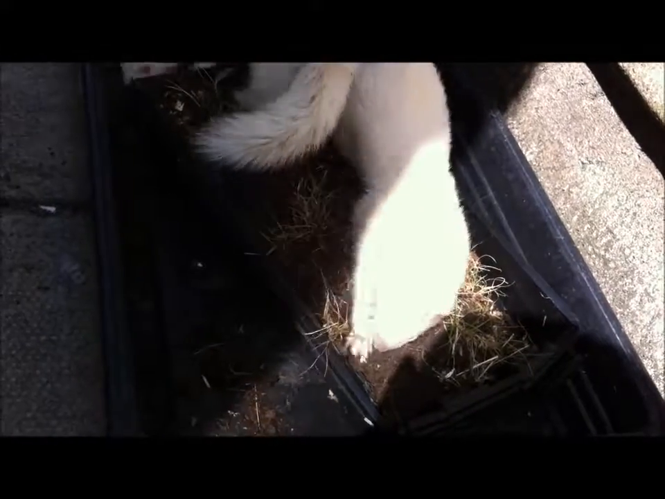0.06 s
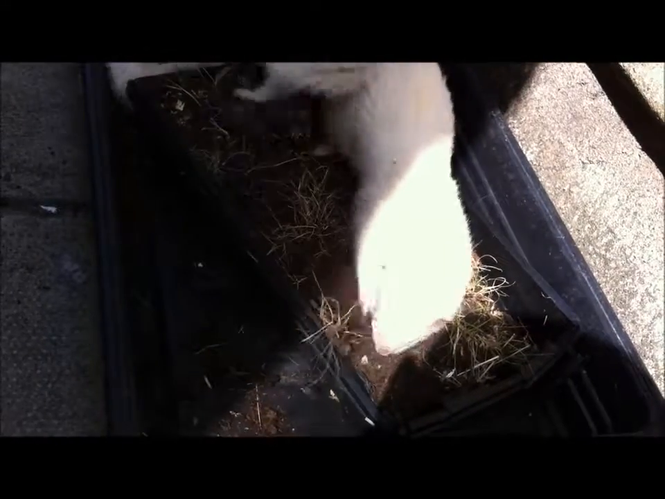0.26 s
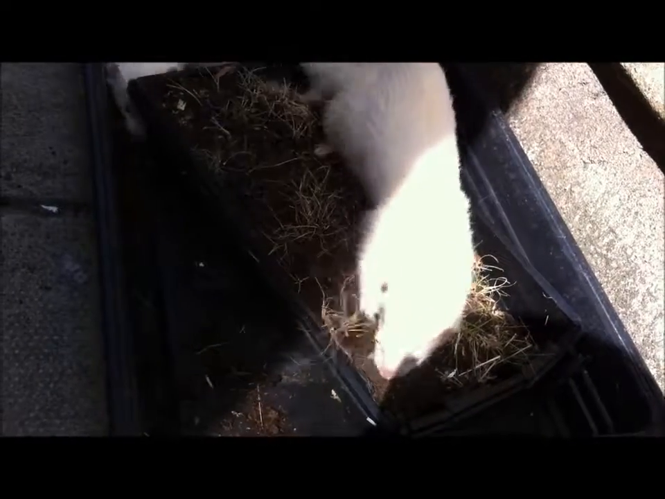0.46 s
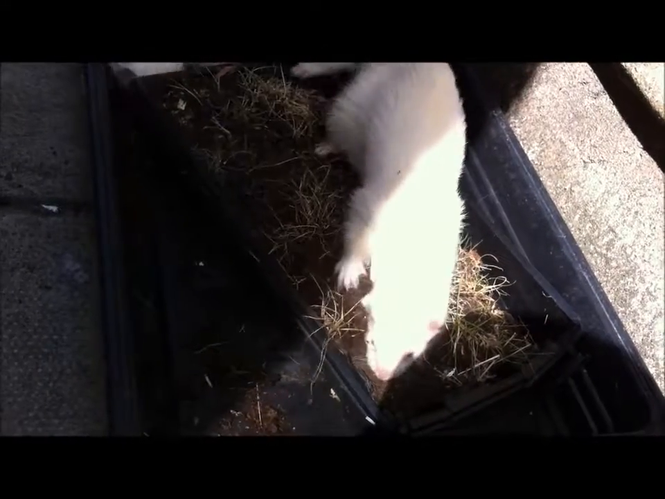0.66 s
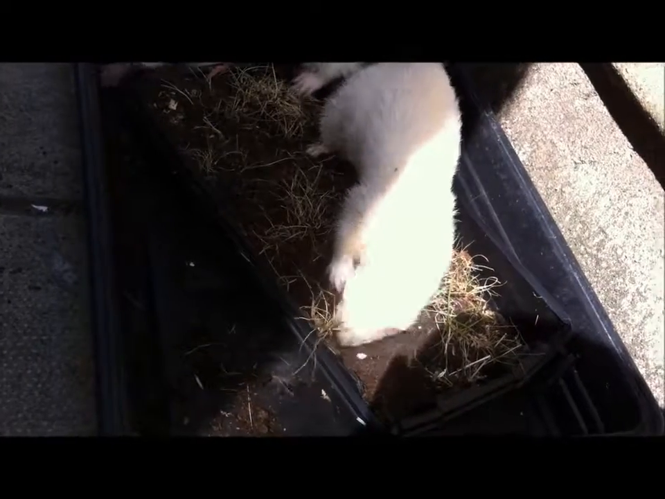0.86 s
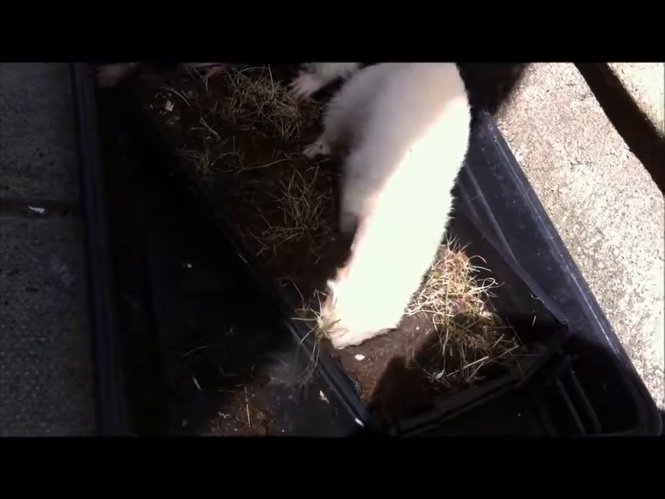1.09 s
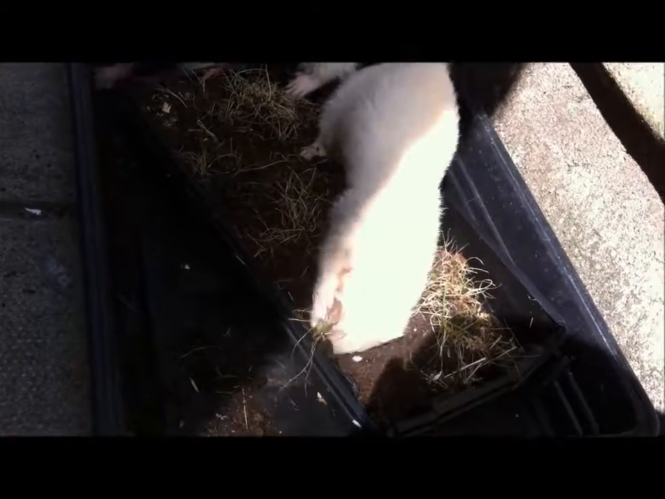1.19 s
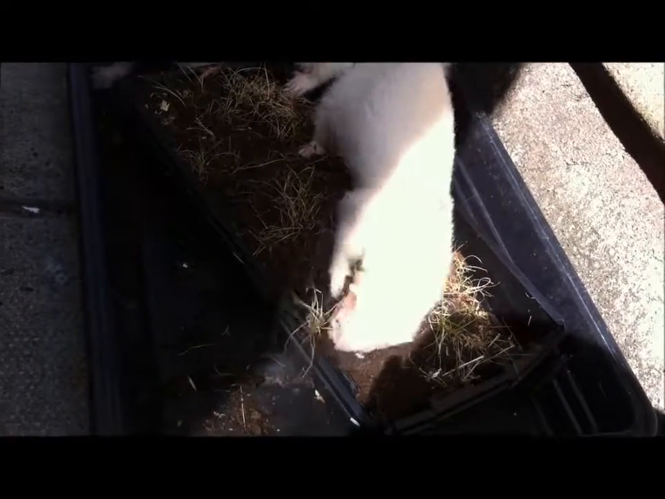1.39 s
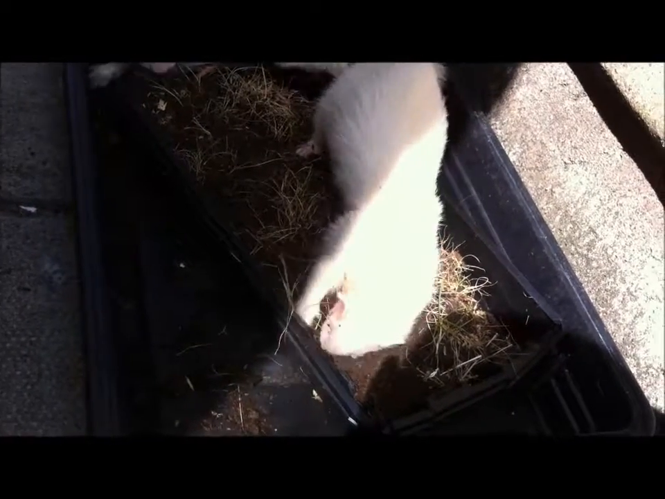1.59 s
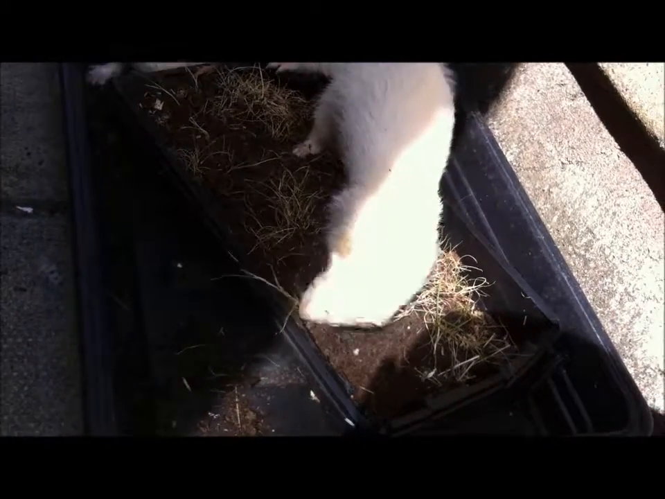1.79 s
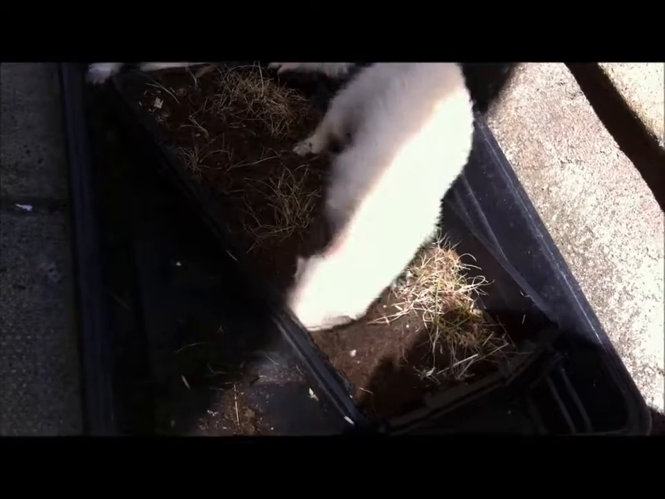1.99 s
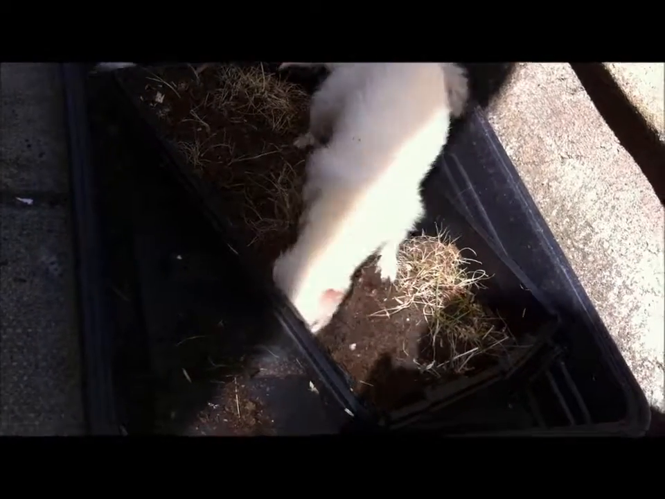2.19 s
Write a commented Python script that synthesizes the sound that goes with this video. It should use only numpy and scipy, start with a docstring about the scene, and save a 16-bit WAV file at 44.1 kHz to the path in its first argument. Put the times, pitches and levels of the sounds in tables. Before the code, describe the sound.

Close scratching and rustling of a small animal digging in straw and soil in a quiet yard. A busy flurry with hollow knocks on a plastic tray gives way to a lull, then more crackles and rim taps.

```python
"""A yard outdoors, close on a plastic tray of soil and straw in which a ferret is digging.
Its strokes shift crumbs and stalks in swells of tiny clicks and hiss; dry stems and grit snap under
its claws. Its paws thump the tray floor, knock the wall and tap the rim, ringing the damped plastic,
and pat softly on loose soil. A short yard echo and a faint bed of outdoor air lie behind."""
import sys
import numpy as np
from scipy import signal
from scipy.fft import rfft, irfft, next_fast_len
from scipy.io import wavfile
from scipy.ndimage import uniform_filter1d

SR = 44100
rng = np.random.default_rng(int(sys.argv[2]) if len(sys.argv) > 2 else 0)


def pcm_store(signal):
    """Save signal as 16-bit PCM."""
    levels = np.round(np.clip(np.atleast_2d(signal), -1, 1) * 32767)
    wavfile.write(sys.argv[1], SR, levels.astype(np.int16).T)


N = 99225
T = np.arange(N) / SR

# tone of the outdoor air (f/Hz, level/dB)
AIR_COLOUR = [(25, -23), (140, -3), (240, -3), (274, 1.5), (322, -8.5), (378, -5), (598, -12.5),
              (826, -8.5), (1410, -16), (1800, -16), (2560, -19), (3900, -19.5), (15500, -24)]
# strokes through the litter (peak t/s, rise/s, fall/s, relative level/dB, tilt/dB per octave,
# stalk resonance f/Hz, its boost/dB)
STROKES = [(.006, 0.016, 0.027, -50.5, -1.5, 4460, 10.5), (.06, 0.019, 0.017, -52, 0, 4270, -8),
           (0.117, 0.02, 0.033, -53.5, 0, 4130, 4.5), (.22, 0.073, 0.38, -60, -2.5, 2300, -1),
           (0.338, 0.013, 0.012, -41.5, -1.2, 1680, 11.5), (0.358, 0.015, 0.028, -43, -2.5, 13500, 10),
           (.378, .014, 0.017, -43.5, 2, 12000, -2), (0.435, 0.012, 0.026, -45.5, -0.5, 2160, 3),
           (.472, 0.029, 0.012, -53.5, 0, 7500, 0), (0.504, 0.018, 0.0094, -48, 5, 4900, 16),
           (0.522, 0.015, 0.032, -45, -1.5, 5280, 11.5), (.62, 0.016, 0.0074, -54.5, 0, 4120, 7),
           (0.64, 0.0067, 0.0075, -55.5, 7, 4430, 8), (.735, 0.056, 0.035, -55, -0.2, 3740, 0.5),
           (.80, 0.018, 0.064, -61, 1, 1000, 11), (0.875, 0.0075, 0.015, -50, 3.5, 8400, 7.5),
           (1.101, 0.0099, 0.03, -59, -2, 1390, 5), (1.21, 0.011, 0.027, -65.5, -1, 9000, 10),
           (1.418, 0.02, 0.016, -55.5, -1.5, 2780, 7), (1.59, 0.032, 0.056, -63.5, -2, 3550, 6),
           (1.632, 0.0076, 0.011, -46.5, -2.2, 11100, 8), (1.676, 0.022, 0.013, -51.5, 0.5, 3600, -2),
           (1.693, 0.0064, 0.02, -56.5, -2, 3600, 1), (1.758, 0.036, 0.085, -54, -1, 4700, -1),
           (1.825, .02, 0.1, -63.5, 6.5, 2300, -4), (1.93, 0.0081, 0.012, -54.5, -1, 2240, 7),
           (1.969, 0.028, 0.006, -57, -2.5, 9600, 4), (2.024, 0.0055, 0.037, -53, -1, 5140, 10),
           (2.24, 0.045, 0.066, -55, 1, 990, 10.5)]
# tone of the soil and straw (f/Hz, level/dB)
LITTER_COLOUR = [(260, -25), (450, 6.5), (650, -3.5), (1080, -5.5), (1290, 0.5), (1780, -4), (1980, -4.5),
                 (2260, 0.5), (3090, -6), (4340, -0.5), (5750, -5.5), (9230, 0), (15500, -7.5)]
# snaps of straw and grit (t/s, relative level/dB, four columns of share/dB for the SNAP_BANDS,
# stem f/Hz, share of its ring/dB)
SNAPS = [(0.0074, -38.5, -27, -8.5, -14.5, -15, 4300, -6),
         (0.0628, -30.5, -23.5, -9, -10.5, -14, 4460, -22), (0.0822, -36.5, -21, -10, -16, -12, 4170, -13),
         (0.1171, -32.5, -24, -9.5, -10, -16.5, 4600, -21),
         (0.2044, -34, -12, -13, -17.5, -15.5, 2290, -21),
         (0.2483, -23.5, -12.5, -6.5, -14.5, -19.5, 2877, -11.5),
         (0.2773, -35.5, -8.5, -10, -11.5, -18, 2210, -10.5), (0.3308, -36, -22, -4, -26, -9, 1890, -14),
         (0.3496, -30.5, -5, -12.5, -9.5, -19, 1780, -9),
         (0.4284, -30, -13.5, -29, -13.5, -13, 1745, -14.5),
         (0.4886, -23, -13, -58, -11.5, -6.5, 5600, -10), (0.6355, -41.5, -34, -22, -6.5, -12, 6300, -5),
         (0.7871, -40.5, -14, -33, -15.5, -6.5, 2250, -20), (1.0176, -52, -13, -19, -9.5, -9.5, 6260, -4),
         (1.6242, -36.5, -19, -10.5, -30, -19, 1130, -10), (1.6741, -39, -18, -3, -15, -9, 3560, -8.5),
         (1.7277, -29.5, -14, -16, -15, -34, 2570, -17), (1.7514, -38.5, -40, -7, -10.5, -8.5, 3000, -24),
         (1.8342, -31.5, -14, -11.5, -26, -16.5, 2330, -17), (1.924, -36, -15, -27, -21, -12.5, 2270, -13),
         (1.9934, -18.5, -24, -13.5, -14, -10, 6770, -20), (2.0487, -39, -10.5, -23, -22, -30, 2890, -12.5),
         (2.2174, -37.5, -10.5, -12.5, -11.5, -6, 2203, -11.5)]
# bands of a snap's burst (low f/Hz, high f/Hz, decay/s, relative level/dB)
SNAP_BANDS = [(535, 1650, 0.0077, -2.5), (1550, 3870, 0.005, -3.5), (3530, 5670, 0.0048, 1),
              (6440, 29000, 0.0034, 1)]
# tone of a snap's burst (f/Hz, level/dB)
SNAP_COLOUR = [(300, 14), (520, 3.5), (800, -2.5), (1300, 1.5), (1700, 3.5), (2500, 7.5), (3200, 3.5),
               (4300, 9), (5600, 2), (6500, 3), (8500, 6.5), (11000, 5.5), (15000, -11)]
# paw thumps on the floor, knocks on the wall, claw taps on the rim (t/s, relative level/dB, contact/s)
FLOOR_THUMPS = [(.249, -42.5, 0.0002), (.329, -42, 0.0016), (.3523, -21.5, 0.002), (.3560, -24, 0.0013),
                (.4332, -30.5, 0.0024), (.4413, -35.5, 0.0033), (.491, -33.5, 0.00084),
                (1.730, -42, 0.00049), (1.827, -46, 0.0014), (1.990, -42.5, 0.0032), (2.054, -40, 0.0016)]
WALL_KNOCKS = [(.352, -41, 0.00035), (.423, -41, 0.00028), (.460, -39, 0.00056), (.4882, -24.5, 0.00015),
               (1.9876, -34.5, 0.00031)]
RIM_TAPS = [(.2487, -25.5, .00009), (.2518, -29.5, 0.000061), (1.6248, -36, 0.00035),
            (1.7285, -32, 0.000071), (1.8348, -42, 0.00043), (2.0492, -41, 0.00021)]
# modes of the tray's floor, wall and stiff rim (f/Hz, relative level/dB, t60 at the hardest blow/s)
FLOOR_MODES = [(250.7, -3.5, 0.2), (278, -4.5, 0.075), (317, -6.5, 0.055), (378, -4.5, 0.045),
               (593, -22, 0.047)]
WALL_MODES = [(739, -11, 0.047), (846, 3.5, 0.025), (1010, -9, 0.05)]
RIM_MODES = [(395, -10.5, .075), (778, -8, 0.043), (1105, -8, 0.094), (1648, 0, 0.042), (2366, 0, 0.048),
             (2730, 3, 0.021), (3330, -1.5, 0.025), (4660, -1, .02), (8500, 2, 0.024)]
# tone of the tray's hollow (f/Hz, level/dB)
TRAY_COLOUR = [(245, -1.5), (370, 4), (480, -12.5), (640, 1), (1000, 2), (1300, -2), (1650, 0.5),
               (11000, -2), (13500, -3.5)]
# soft paw pats on loose soil (t/s, level/dB)
PATS = [(0.792, -60.5), (1.09, -58), (1.424, -57)]


def undb(db):
    """Decibels to gain."""
    return 10 ** (np.asarray(db) / 20)


def unit(x):
    """Scale to rms 1."""
    return x / np.sqrt(np.mean(x ** 2) + 1e-30)


def colour(x, points):
    """EQ by a curve of (f/Hz, level/dB) points."""
    hz, db = np.array(points, float).T
    f = np.maximum(np.fft.rfftfreq(len(x), 1 / SR), 1)
    return irfft(rfft(x) * undb(np.interp(np.log(f), np.log(hz), db)), len(x))


def cut(x, hz, kind, order=2):
    """Low-, high- or band-pass."""
    return signal.sosfilt(signal.butter(order, np.minimum(hz, SR / 2 - 1), kind, fs=SR, output="sos"), x)


def add(out, at, x):
    """Mix a sound in at a time in seconds."""
    i = max(int(at * SR), 0)
    out[i:i + len(x)] += x[:max(N - i, 0)]


def even_noise(count):
    """Noise with equal strength at every frequency."""
    return unit(irfft(np.exp(2j * np.pi * rng.random(count // 2 + 1)), count))


def air(level_db=-61.5):
    """A faint, steady bed of outdoor air."""
    return undb(level_db) * unit(colour(rng.standard_normal(N), AIR_COLOUR))


def rustle(grains_per_s=2400, spread_db=4, grain_ring_s=0.0021, soil_share=0.58, trim_db=2):
    """Strokes set off showers of tiny stalk clicks over the hiss of sliding soil."""
    low_hz, pivot_hz, stalk_width_octaves = 294, 4500, 0.29
    sizes = undb(spread_db * np.minimum(rng.exponential(size=N), 3.5))
    clicks = (rng.random(N) < grains_per_s / SR) * sizes * rng.choice([-1, 1], N)
    click_energy = signal.fftconvolve(clicks ** 2, np.exp(-2 * T[:N // 256] / grain_ring_s))[:N]
    grains = unit(np.sqrt(np.abs(click_energy)) * rng.standard_normal(N))
    soil = soil_share * rng.standard_normal(N)
    litter = cut(colour(grains + soil, LITTER_COLOUR), low_hz, "highpass")
    size = next_fast_len(N)
    spectrum = rfft(litter, size)
    octaves = np.log2(np.maximum(np.fft.rfftfreq(size, 1 / SR), low_hz) / pivot_hz)
    out = np.zeros(N)
    for at, rise, fall, db, tilt, stalk_hz, stalk_db in STROKES:
        detune = (octaves - np.log2(stalk_hz / pivot_hz)) / stalk_width_octaves
        eq_db = tilt * octaves + stalk_db / (1 + detune ** 2)
        texture = unit(irfft(spectrum * undb(eq_db), size)[:N])
        swell = np.exp(-np.where(T < at, ((T - at) / rise) ** 2, (T - at) / fall))
        out += undb(db + trim_db) * swell * texture
    return out


def snaps(rise_s=0.00081, hold_s=0.0011, grit_depth=0.038, burst_trim_db=1):
    """Each break is a gritty burst whose treble dies first; the stem rings in close pairs of modes."""
    stem_decay_s, pair_split = 0.0059, 0.018
    overtone_ratio, overtone_db = 1.5, -13  # the stem's second bending mode
    out, t = np.zeros(N), T[:N // 32]
    attack = np.minimum(t / rise_s, 1) ** 2
    for at, db, *shares, stem_hz, stem_db in SNAPS:
        grit = np.exp(grit_depth * unit(uniform_filter1d(rng.standard_normal(len(t)), size=20)))
        crackle = np.concatenate([even_noise(count=128) for _ in t[::128]])[:len(t)]
        burst = colour(crackle * grit, SNAP_COLOUR)
        for (low, high, decay, band_db), share in zip(SNAP_BANDS, shares):
            env = attack * np.exp(-np.maximum(t - hold_s, 0) / decay)
            band = unit(cut(burst, [low, high], "bandpass", order=3) * env) * np.sqrt(np.mean(env ** 2))
            add(out, at, band * undb(db + share + band_db + burst_trim_db))
        ring = np.zeros(len(t))
        for ratio, mode_db in ((1, 0), (overtone_ratio, overtone_db)):
            for side in (-1, 1):
                hz = stem_hz * ratio * (1 + side * pair_split / 2)
                ring += undb(mode_db) * np.sin(2 * np.pi * (hz * t + rng.random()))
        add(out, at, undb(db + stem_db) * attack * np.exp(-t / stem_decay_s) * ring)
    return out


def yard_echo(x, t60_s=0.29, level_db=-17, predelay_s=0.0078, band_hz=(520, 6260)):
    """Paving and walls return a short, thin and duller echo."""
    t = T[:N // 5]
    tail = cut(even_noise(len(t) + 2)[:len(t)], band_hz, "bandpass", order=1)
    tail *= (t > predelay_s) * np.exp(-np.log(1000) * t / t60_s)
    return undb(level_db) * signal.fftconvolve(x, tail / np.linalg.norm(tail))[:N]


def tray_hits(blows, modes, spot_spread_db=2.8):
    """A brief push rings the plastic; the spot that is hit varies the mix of modes."""
    soil_damping = 0.1  # soil on the plastic chokes light blows: dB of ring time per dB of force
    out, t = np.zeros(N), T[:N // 6]
    hardest_db = max(db for _, db, _ in blows)
    for at, db, contact in blows:
        spot_gains = undb(spot_spread_db * rng.standard_normal(len(modes)))
        sustain = undb(soil_damping * (db - hardest_db))
        ring = np.zeros(len(t))
        for gain, (hz, mode_db, t60) in zip(spot_gains, modes):
            decay = np.exp(-np.log(1000) * t / (t60 * sustain))
            ring += gain * undb(mode_db) * decay * np.sin(2 * np.pi * hz * t)
        push = np.sin(np.pi * np.minimum(t / contact, 1))
        hit = signal.fftconvolve(ring, push)[:len(t)]
        add(out, at, undb(db) * hit / np.abs(hit).max())
    return out


def pats(pitch_hz=138.5, rise_s=0.01):
    """Paws press the soil with a dull thud of a few cycles."""
    out, t = np.zeros(N), T[:N // 16]
    thud = t / rise_s * np.exp(1 - t / rise_s) * np.sin(2 * np.pi * pitch_hz * t)
    for at, db in PATS:
        add(out, at, undb(db) * thud)
    return out


def scene(mic_rolloff_hz=185):
    """The digging, coloured by the tray and thin in the deep bass, with pats, echo and air, in mono."""
    contacts = snaps() + rustle()
    contacts += tray_hits(FLOOR_THUMPS, FLOOR_MODES)
    contacts += tray_hits(WALL_KNOCKS, WALL_MODES)
    contacts += tray_hits(RIM_TAPS, RIM_MODES)
    digging = cut(colour(contacts, TRAY_COLOUR), mic_rolloff_hz, "highpass", order=3)
    return (digging + pats() + yard_echo(digging) + air())[None]


def record(dry, top_hz=15750):
    """A steep low-pass shaves the very top off the mix."""
    return signal.sosfilt(signal.ellip(10, .2, 70, top_hz, fs=SR, output="sos"), dry)


dry = scene()
out = record(dry)
pcm_store(out)
```